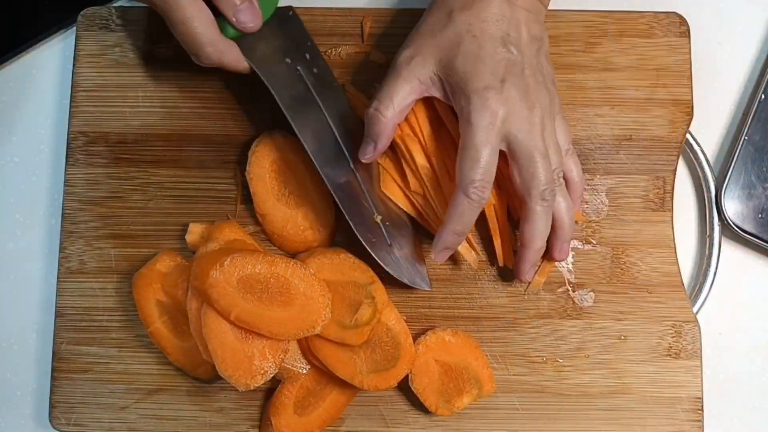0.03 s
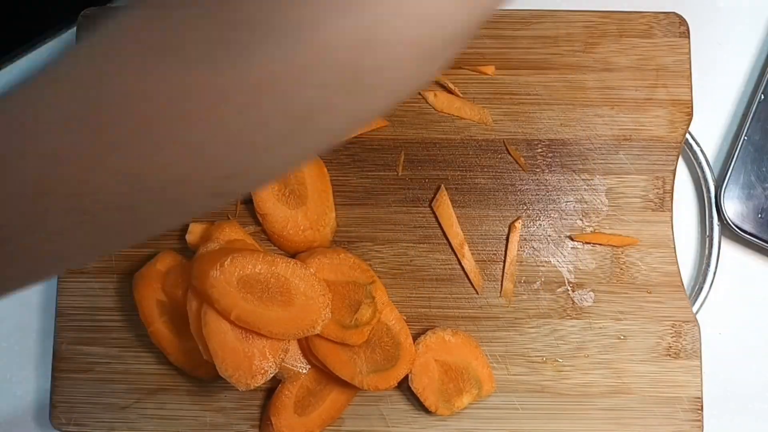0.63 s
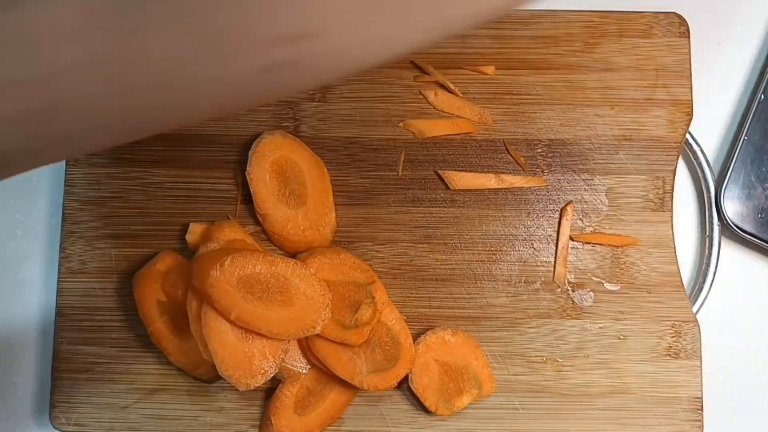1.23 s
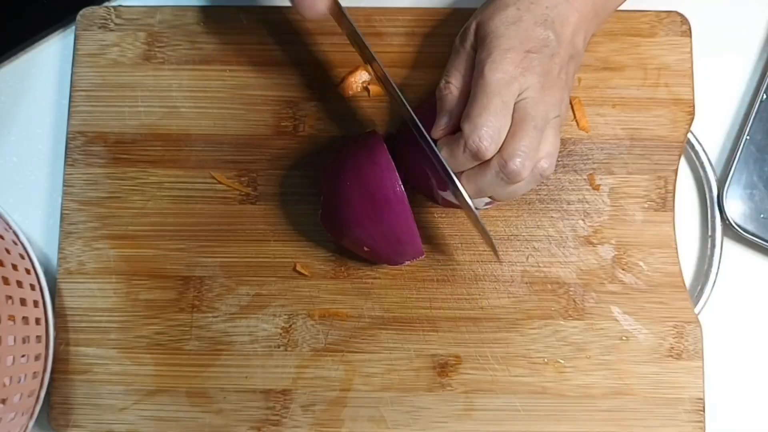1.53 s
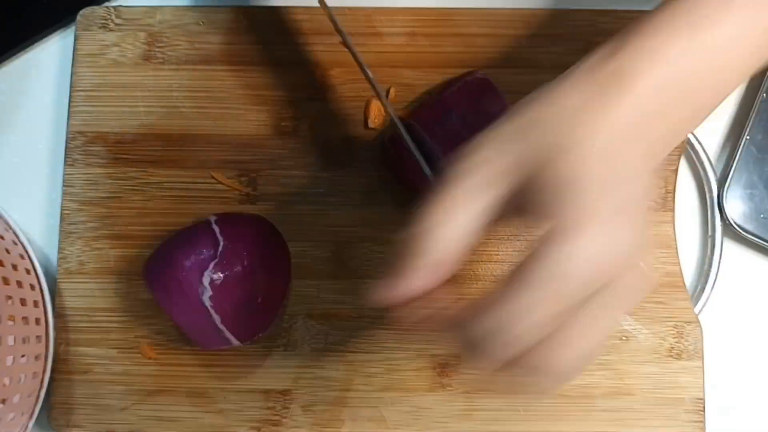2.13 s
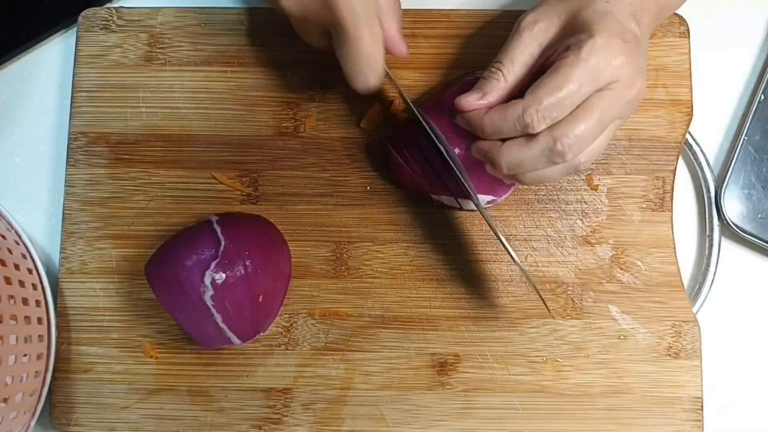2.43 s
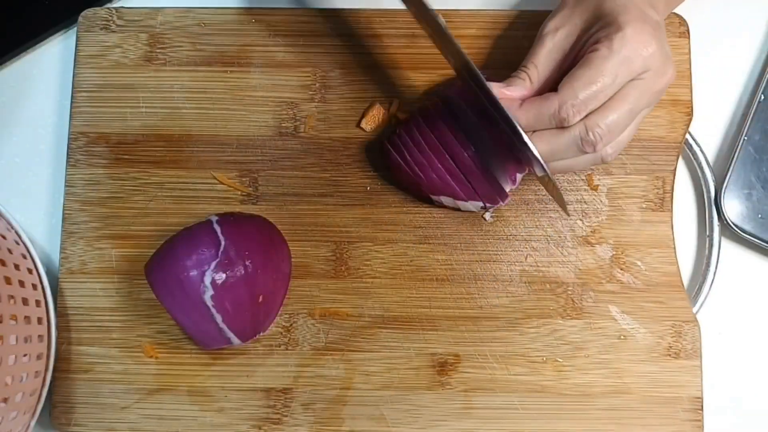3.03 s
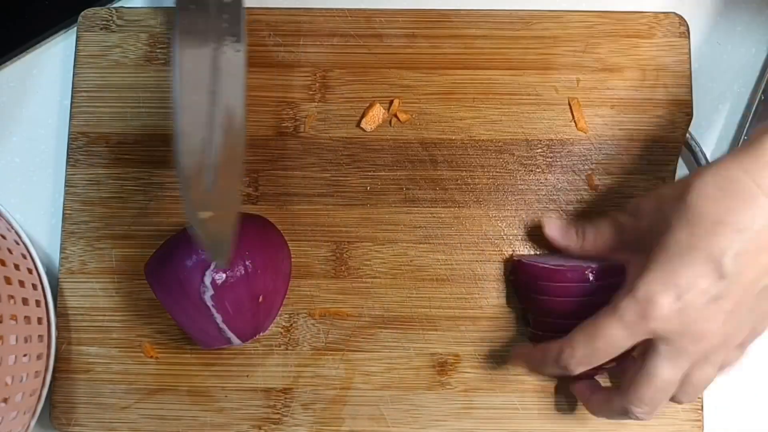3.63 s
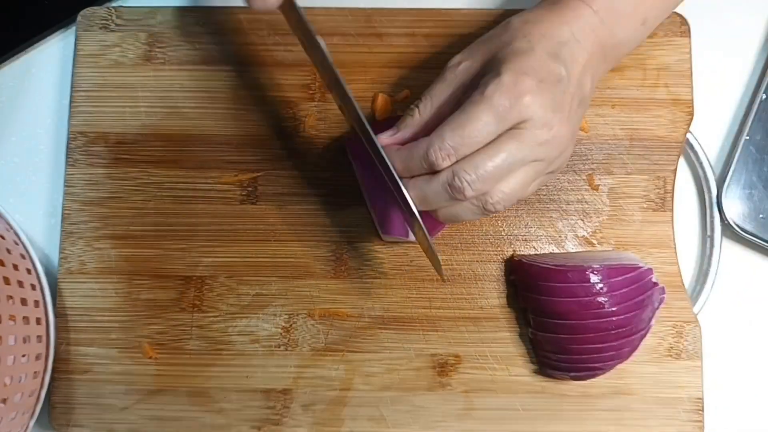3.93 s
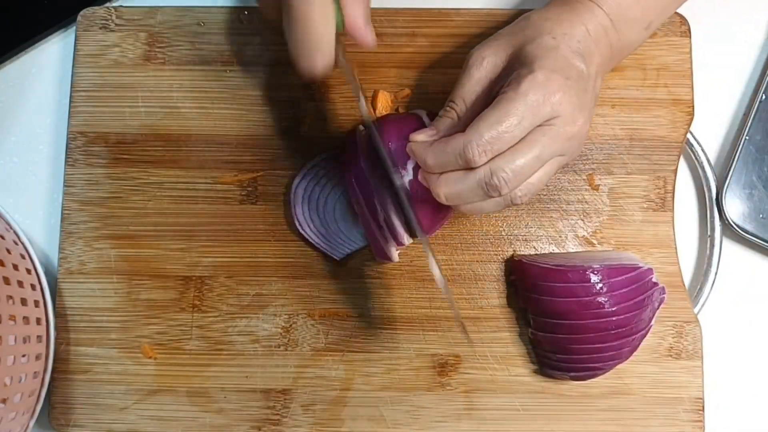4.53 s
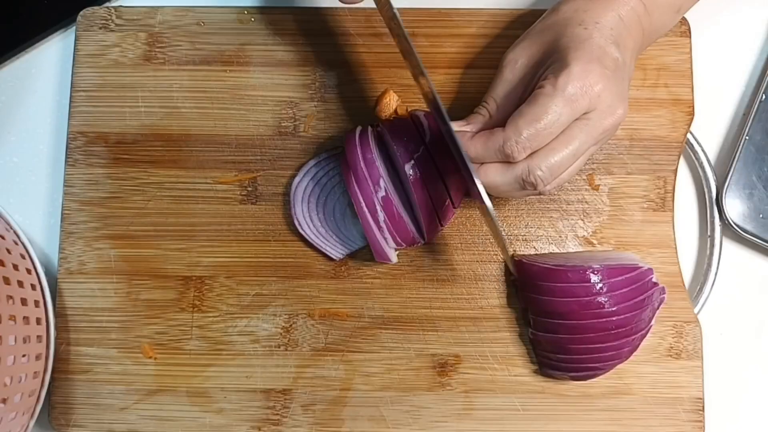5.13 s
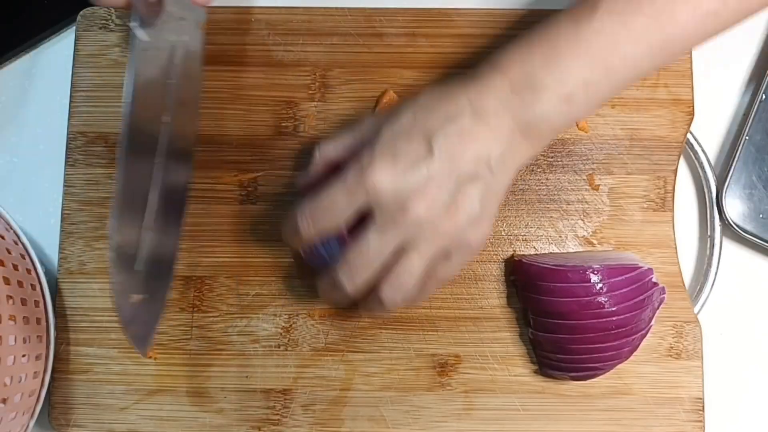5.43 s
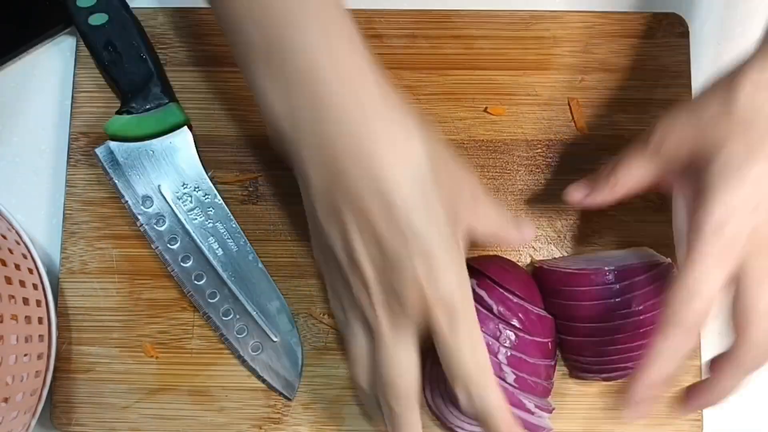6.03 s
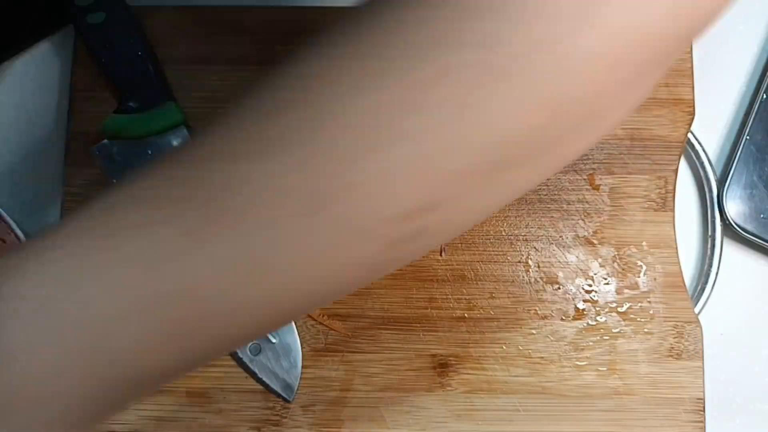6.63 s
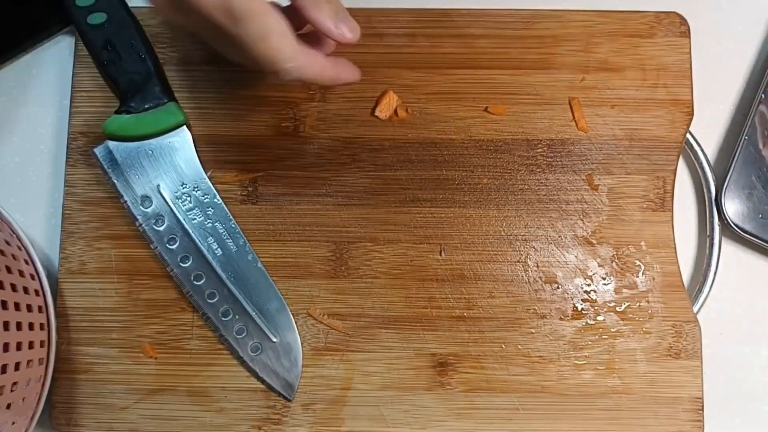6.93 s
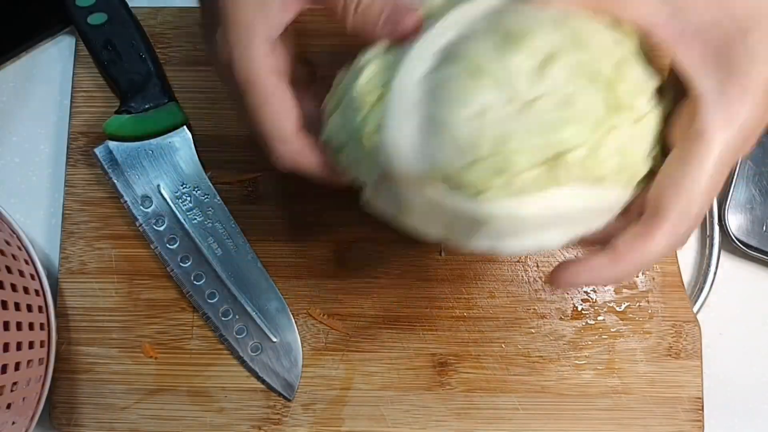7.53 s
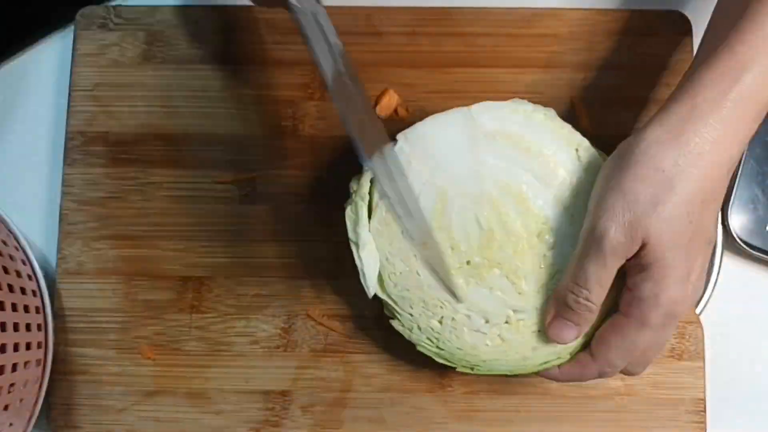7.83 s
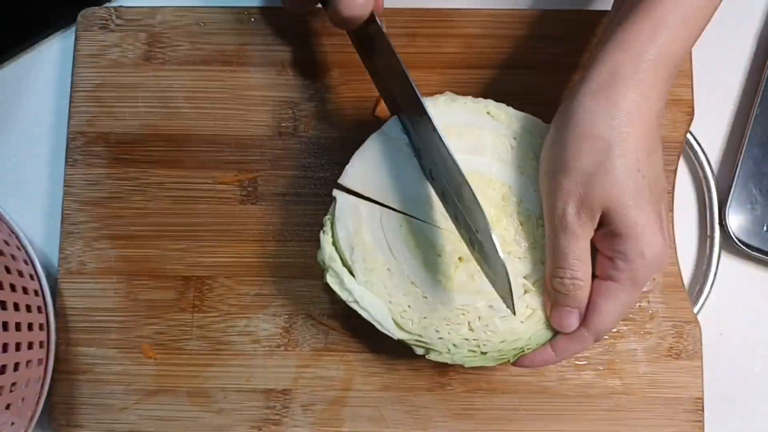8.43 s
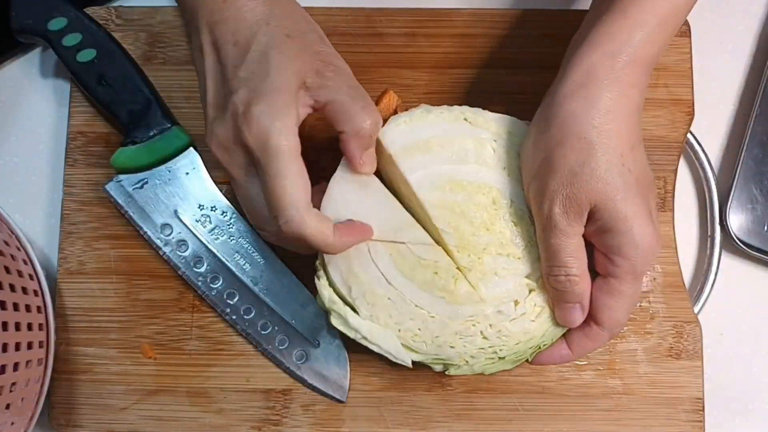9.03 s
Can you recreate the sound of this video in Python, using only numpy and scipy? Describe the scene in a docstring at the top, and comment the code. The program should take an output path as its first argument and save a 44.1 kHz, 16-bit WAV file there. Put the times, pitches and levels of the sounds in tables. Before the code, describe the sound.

A kitchen knife works through vegetables on a wooden board, heard close in a small kitchen with brief reverberation and faint, steady low room noise. In the first second come two light carrot cuts and a tap of the blade. From 1.5 to 3.3 seconds it slices onion in seven uneven strokes, each a short wet crunch ending in a sharp clack, a slight steel ring and a soft low bump. A quicker, regular run follows from 4 to 5.2 seconds. Around 5.8 seconds the knife is put down with a small clatter, and light handling ticks follow. A sharp knock comes at 7.2 seconds, then a dull thump at 7.6 as a cabbage lands. From 8 to 8.5 seconds the cabbage crunches under the blade while the worktop booms softly. Two clacks with a crunch come near 8.7 seconds, then leaves crackle and snap lightly until about 9.3.

```python
"""A kitchen knife shreds carrot, slices onion and cuts into a cabbage on a wooden board.
Each stroke fractures wet cells in a spray of clicks, then the edge strikes the wood and excites
the damped modes of board and blade. Hands shift and set down the vegetables. The jostled worktop
resonates with a soft boom, and the small kitchen adds brief reverberation over steady room noise."""
import sys
import numpy as np
from scipy import signal
from scipy.fft import rfft, irfft, next_fast_len
from scipy.io import wavfile
from scipy.ndimage import map_coordinates

SR = 44100
rng = np.random.default_rng(int(sys.argv[2]) if len(sys.argv) > 2 else 0)


def to_wav(s):
    """Save 16-bit WAV."""
    ch = np.atleast_2d(s).T  # columns
    pcm = np.round(np.clip(ch, -1, 1) * 32767)  # PCM
    wavfile.write(sys.argv[1], SR, pcm.astype(np.int16))


N = 408807

# Levels in the tables are relative: each source adds its own gain.
# spectra of room noise, worktop, light touch, edge impact and cell fracture: (frequency [Hz], level [dB])
AIR_SPECTRUM = [(25, -14.5), (55, -17.5), (105, -9.5), (140, -8.5), (200, -3), (280, 1), (380, -15.5),
                (470, -10.5), (750, -26.5), (1020, -25.5), (1400, -32), (4000, -34), (8000, -41),
                (16000, -42)]
BOOM_SPECTRUM = [(25, -19), (55, -18), (80, -21), (106, -10), (138, -16), (165, -25.5), (195, 1.5),
                 (235, -12.5), (290, -9.5), (370, -30), (450, -27), (600, -40.5), (1200, -75)]
TICK_SPECTRUM = [(100, -38), (700, -27.5), (1400, -11), (2900, -8), (4000, -9), (7000, -11), (16000, -13)]
CLACK_SPECTRUM = [(100, -47.5), (500, -44), (800, -30), (1100, -17), (1800, -8.5), (2300, -9), (2900, -0.5),
                  (3700, -10.5), (4700, -1.5), (6500, -15), (9000, -19.5), (16000, -37.5)]
CRUNCH_SPECTRUM = [(100, -39.5), (800, -21), (1300, -13), (1800, -0.5), (2300, -3.5), (2900, 0.5),
                   (3600, -6), (4500, 1.5), (7500, -3), (11000, -0.5), (16000, 0.5)]
# reverberation time of the kitchen: (frequency [Hz], t60 [s])
ROOM_DECAY = [(200, .14), (1000, 0.095), (3000, 0.085), (8000, 0.092), (16000, 0.066)]
# colour of the microphone ports: (frequency [Hz], left minus right [dB])
PORT_BALANCE = [(100, 1.5), (260, -0.5), (550, 2.5), (1100, 5.5), (2400, -3.5), (4500, 3), (9000, -2.5),
                (15000, -1)]
# the board under the edge: (frequency [Hz], bandwidth [Hz], level [dB])
BOARD_MODES = [(446, 33, -8.5), (696.4, 33, -2.5), (1001.6, 60, -2), (1222, 230, -8)]
# the board's low bounce and hollow knock under a blow: (frequency [Hz], level [dB], t60 [s])
BOUNCE_MODES = [(104.4, -9.5, 0.15), (198, -3, 0.15), (255, 5.5, 0.055), (308, -18, 0.095)]
KNOCK_MODES = [(416, -11, 0.066), (464, 2.5, 0.052), (532, -13, 0.0478), (690, -7.5, 0.085), (1534, 0, .05)]
# the steel blade: (frequency [Hz], level [dB])
BLADE_MODES = [(1840, -12.5), (2053, -10), (2245, -4), (2640, -4.5), (2688, -8.5), (2885, 2), (3045, -10.5),
               (3240, 4.5), (3632, -7.5), (3782, -10.5), (4490, -11.5), (4722, -9)]
# hands lean on the board or shift it: (midpoint [s], duration [s], boom [dB])
PUSHES = [(0.122, 0.0097, -40.5), (0.23, 0.014, -41), (0.343, 0.025, -42.5), (1.192, 0.027, -44.5),
          (2.376, 0.017, -43), (3.534, 0.028, -42), (3.92, 0.065, -42), (4.455, 0.046, -38),
          (6.348, 0.26, -49.5), (7.081, 0.074, -30), (7.289, 0.094, -30), (7.451, 0.0084, -43),
          (7.588, 0.07, -31.5), (7.74, 0.11, -37), (8.077, .06, -40), (8.356, 0.056, -30),
          (8.463, 0.023, -37), (9.089, 0.02, -39)]
# dull blows of a vegetable or the blade on the board: (time [s], level [dB], knock [dB])
THUDS = [(0.532, -30.5, 0.5), (1.446, -37.5, -13.5), (2.05, -24, -4), (3.044, -27, -24),
         (7.577, -11.5, -27)]
# knife and vegetables are put down, picked up or snapped: (time [s], level [dB], treble [dB])
TOUCHES = [(0.1605, -22, -43.5), (0.2523, -32, -11.5), (0.5024, -24, -46), (2.0505, -22.5, -22),
           (5.335, -32.5, 10), (5.7555, -13, -9.5), (5.7808, -22, 5), (5.794, -19.5, -8),
           (5.8344, -16.5, -16), (5.8586, -13.5, -14), (6.1373, -44.5, -18.5), (6.5139, -21.5, -20.5),
           (6.5533, -35, -26), (6.66, -44, -21), (6.6955, -32, -21), (7.159, -24.5, -6.5),
           (7.2189, -3.5, -1.5), (7.3342, -31.5, 22), (7.5757, -16, -10), (7.6928, -28, -21.5),
           (8.1495, -29.5, -16.5), (8.215, -43, 7), (8.7205, -23, -15.5), (8.742, -16.5, -13.5),
           (8.8802, -29, -8), (9.036, -23, -10), (9.0816, -23, -4), (9.2449, -17, -3)]
# food slides under the hand or leaves tear: (start [s], duration [s], level [dB], treble [dB])
RUBS = [(0.876, 0.011, -40.5, -16), (1.364, 0.018, -53.5, -9), (1.44, 0.016, -53, -1),
        (1.562, 0.14, -62, 3), (1.816, .07, -62, -13), (1.919, 0.091, -58, -4.5), (2.095, .045, -53.5, -7),
        (2.348, 0.14, -62.5, -4.5), (3.528, 0.036, -60, 3), (3.723, .05, -49.5, -8.5),
        (3.934, 0.15, -46, -5), (5.339, 0.17, -82.5, 17.5), (5.771, 0.028, -43.5, 2.5),
        (5.837, 0.027, -45, 7), (5.939, 0.14, -64, -4.5), (7.16, 0.11, -46, -4.5), (7.438, 0.1, -68, 7.5),
        (7.656, 0.054, -49.5, -3.5), (7.893, .25, -54, -3), (8.009, 0.025, -37, -3.5),
        (8.076, 0.017, -36, -0.5), (8.359, .045, -46.5, -5), (8.426, 0.12, -37.5, -5.5),
        (8.478, 0.02, -30.5, -7), (8.899, 0.072, -52, -2), (8.99, 0.094, -51, -2), (9.165, 0.01, -48, 6),
        (9.218, 0.034, -50.5, 4.5)]
# the bare edge taps the board or the hard cabbage: (time [s], level [dB], treble [dB], body [dB])
TAPS = [(0.0666, -22, -21.5, -52), (0.9237, -14, -21, -54), (4.4054, -9, -33.5, -43),
        (8.6885, -8.5, -22, -35)]
# the knife pricks the skin, cuts the flesh and lands: (landing [s], cutting time [s], prick [dB],
# crunch [dB], crunch treble [dB], clack [dB], clack treble [dB], body [dB], boom [dB])
STROKES = [(0.213, .072, -44.5, -34.5, -13.5, -32, -45, -41, -60),
           (0.5233, .026, -64, -30.5, -7, -18, -9, -20, -44.5),
           (1.522, .031, -58, -30, -9.5, -11.5, -23.5, -28, -38.5),
           (1.7135, 0.033, -28, -31.5, -9.5, -9.5, -25.5, -44.5, -47.5),
           (2.2973, 0.059, -60, -31.5, -10, -17.5, -62, -65, -41.5),
           (2.5894, 0.037, -52, -29, -9.5, -9, -16, -19, -53),
           (2.7546, 0.038, -52, -28.5, -10, -9, -31.5, -35, -49),
           (2.8971, 0.038, -28.5, -28, -10.5, -7, -20, -37, -43),
           (3.0841, .054, -51.5, -33, -4, -14, -57, -25, -44.5),
           (3.3193, .064, -44, -34.5, -5.5, -8, -14.5, -29, -43),
           (4.0172, .042, -27.5, -34, -6, -3.5, -8.5, -55, -50),
           (4.1852, .047, -22.5, -31, -9, -10, -27.5, -39, -42),
           (4.341, .043, -24, -33, -5, -44, -37, -38, -39.5),
           (4.6408, .036, -23, -29.5, -8.5, -7, -21.5, -31, -42),
           (4.81, .036, -26, -30, -5.5, -9, -31.5, -56, -44),
           (4.9797, .033, -27, -32.5, -5.5, -7, -21, -41, -42.5),
           (5.1537, .031, -28.5, -35.5, -3, -8.5, -20, -26.5, -38),
           (8.7594, 0.065, -44, -29.5, -8, -8.5, -12, -29, -54)]


def amp(db):
    """Amplitude ratio of a level in decibels."""
    return 10 ** (np.asarray(db) / 20)


def unit(x):
    """The signal scaled to an RMS of 1."""
    return x / np.sqrt(np.mean(x ** 2) + 1e-20)


def along(points, hz):
    """Interpolation of (frequency [Hz], value) points on a logarithmic frequency axis."""
    frequencies, values = np.transpose(points)
    return np.interp(np.log(hz + 1), np.log(frequencies + 1), values)


def wobble(rate, size=N):
    """A smooth random curve with `rate` knots a second."""
    knots = rng.standard_normal(int(size * rate / SR) + 4)
    return map_coordinates(knots, [np.arange(size) * rate / SR])


def filtered(x, response):
    """Linear filtering: the spectrum times a complex frequency response."""
    size = x.shape[-1]
    padded = next_fast_len(size + 4096)
    return irfft(rfft(x, padded) * response(np.fft.rfftfreq(padded, 1 / SR)), padded)[..., :size]


def add(track, start_s, sound):
    """Superposition of a sound on a track."""
    i = max(0, round(start_s * SR))
    track[i:i + len(sound)] += sound[:max(0, len(track) - i)]


def shelf(hz, edge_hz):
    """A smooth step: 0 in the bass, 1 well above the edge."""
    return hz ** 4 / (hz ** 4 + edge_hz ** 4)


def snap(spectrum_db, size=4096):
    """Minimum phase gives the most compact causal pulse with this spectrum; its peak is 1."""
    cepstrum = irfft(np.log(amp(spectrum_db(np.fft.rfftfreq(size, 1 / SR)))))
    cepstrum[1:size // 2] *= 2
    cepstrum[size // 2 + 1:] = 0
    pulse = irfft(np.exp(rfft(cepstrum)))
    return pulse / np.abs(pulse).max()


def ring(modes, t):
    """Free vibration: damped modes, with new strengths and phases at each strike."""
    return sum(amp(db + 1.5 * rng.standard_normal() - 60 * t / t60)
               * np.sin(2 * np.pi * (hz * t + rng.random())) for hz, db, t60 in modes)


def contact(spectrum_db, chatter_db, chatter_t60, size=2048):
    """An impact is one sharp force pulse followed by decaying chatter of the surfaces."""
    t = np.arange(size) / SR
    chatter = amp(chatter_db - 60 * t / chatter_t60) * rng.choice([-1, 1], size)
    force = chatter * (1 - np.exp(-t / 0.00044))
    force[0] = 1
    pulse = snap(spectrum_db)
    sound = signal.fftconvolve(force, pulse)
    return sound * np.linalg.norm(pulse) / np.linalg.norm(sound)


def room_noise():
    """Steady diffuse noise is coherent at the two microphones only at long wavelengths."""
    common, apart = filtered(rng.standard_normal((2, N)), lambda hz: amp(along(AIR_SPECTRUM, hz)))
    apart = filtered(apart, lambda hz: 0.24 + 1.3 * shelf(hz, 600))
    return amp(-57.5) * unit(np.array([common + apart, common - apart]))


def reverberation(x, blocks=48, build_s=0.0021, hold_s=0.003):
    """Near walls reflect a dense, fast-decaying cluster of echoes that shifts as hands and arms move."""
    out, step = np.zeros((2, N)), N // blocks + 1
    hz, t, noise = signal.stft(rng.standard_normal((blocks, 2, SR // 8)), SR, nperseg=256)
    decay = amp(-60 * np.maximum(t - hold_s, 0) / along(ROOM_DECAY, hz)[:, None])
    tails = signal.istft(noise * decay, SR, nperseg=256)[1]
    tails *= 1 - np.exp(-(np.arange(tails.shape[-1]) / SR / build_s) ** 2)
    for i, tail in zip(range(0, N, step), tails):
        echo = signal.fftconvolve(x[None, i:i + step], tail / np.linalg.norm(tail[0]), axes=1)[:, :N - i]
        out[:, i:i + echo.shape[1]] += echo
    return out


def near_reflection(x, delay_s=0.001041, echo_db=-9):
    """Comb filtering: a dull echo from a nearby surface interferes with the direct sound."""
    echo = lambda hz: amp(echo_db) * np.exp(-2j * np.pi * hz * delay_s) * (1 - shelf(hz, 3400))
    return filtered(x, lambda hz: 1 + echo(hz))


def microphones(x, lag_samples=13.5):
    """Path difference: sound reaches the nearer, right microphone first; each port colours it."""
    side = np.array([[1], [-1]])
    delay = lambda hz: np.exp(-1j * np.pi * hz / SR * lag_samples * side)
    return filtered(x, lambda hz: amp(side * along(PORT_BALANCE, hz) / 2) * delay(hz))


def jostle_level(hold_s=.035, edge_s=0.016, rest_db=-57, swing_db=4.5):
    """Powers add: the worktop's level in dB sums an uneven murmur and a swell per stroke or push."""
    t = np.arange(0, N, 64) / SR
    strokes = [(s - cut_s / 2, s + hold_s, db) for s, cut_s, *_, db in STROKES]
    pushes = [(s - length / 2, s + length / 2, db) for s, length, db in PUSHES]
    power = sum(amp(2 * db) * np.exp(-2 * ((t - np.clip(t, start, end)) / edge_s) ** 2)
                for start, end, db in strokes + pushes)
    murmur = amp(rest_db + swing_db * wobble(14))
    return 10 * np.log10(np.interp(np.arange(N) / SR, t, power) + murmur ** 2)


def worktop(ring_hz=192, waver_hz=9):
    """Jostling excites the worktop's low resonances; one mode dominates the strongest swells."""
    level_db = jostle_level()
    rumble = unit(filtered(rng.standard_normal(N), lambda hz: amp(along(BOOM_SPECTRUM, hz))))
    tone = np.sqrt(2) * np.sin(2 * np.pi * np.cumsum(ring_hz + waver_hz * wobble(25)) / SR)
    tone_share = np.clip((level_db + 47.5) / 20, 0, .9)
    return amp(level_db) * (np.sqrt(1 - tone_share) * rumble + np.sqrt(tone_share) * tone)


def thuds(landing_knock_db=-18.5):
    """Soft blows and knife landings excite the board's low modes; harder blows add a higher knock."""
    out, t = np.zeros(N), np.arange(SR // 4) / SR
    landings = [(s, boom_db + 1, landing_knock_db) for s, *_, boom_db in STROKES]
    bounce = sum(amp(db - 60 * t / t60) * np.sin(2 * np.pi * hz * t) for hz, db, t60 in BOUNCE_MODES)
    for s, db, knock_db in THUDS + landings:
        add(out, s, amp(db - 3.5) * bounce * (1 - np.exp(-t / 0.0017)))
        add(out, s, amp(db + knock_db + 5) * ring(KNOCK_MODES, t) * (1 - np.exp(-t / 0.0015)))
    return out


def ticks(skin_hold_s=.016, skin_treble_db=-5.5, rustles_per_s=4.6):
    """Brief contacts have broad spectra: handling, the prick before each cut, stray fingers and peel."""
    out = np.zeros(N)
    pricks = [(s - cut_s - skin_hold_s, db, skin_treble_db) for s, cut_s, db, *_ in STROKES]
    draws = rng.random((int(rustles_per_s * N / SR), 2))
    rustles = [(when * N / SR, -58 + 7 * (2 * size - 1), skin_treble_db) for when, size in draws]
    for s, db, treble_db in TOUCHES + pricks + rustles:
        colour = lambda hz: along(TICK_SPECTRUM, hz) + 1.38 * (treble_db + 7.5) * shelf(hz, 5500)
        add(out, s, amp(db + 11.5) * contact(colour, chatter_db=-2.5, chatter_t60=0.014))
    return out


def board_response(hz):
    """Modal superposition: the board responds as a sum of resonators of alternating sign."""
    return sum((-1) ** k * amp(db) * 1j * hz * width / (centre ** 2 - hz ** 2 + 1j * hz * width)
               for k, (centre, width, db) in enumerate(BOARD_MODES))


def blade(t, t60=0.061):
    """The steel's free vibration is quickly damped by hand and food."""
    return ring([(hz, db, t60) for hz, db in BLADE_MODES], t)


def crunch(cut_cells_per_s=4500, rub_cells_per_s=600, bite_s=.0035, swell_s=.01, release_t60=0.0085):
    """Fracture: cell walls burst in random clicks. Firm cuts bite and ring the blade; soft rubs swell."""
    out = np.zeros(N)
    # the last two values: drive on the board [dB], unevenness of the yielding fibres [dB]
    cuts = [(s - cut_s, cut_s, db, treble_db, -10.5, 0.8) for s, cut_s, _, db, treble_db, *_ in STROKES]
    rubs = [(*rub, -22, 3.5) for rub in RUBS]
    for start, length, db, treble_db, body_db, catch_db in cuts + rubs:
        t = np.arange(int((length + .05) * SR)) / SR
        firmness = np.clip((db + 59) / 22, 0, 1)
        density = rub_cells_per_s + firmness * (cut_cells_per_s - rub_cells_per_s)
        bursts = (rng.random(len(t)) < density / SR) * rng.standard_normal(len(t))
        # the flesh gives way layer by layer while fibres catch more slowly
        layers = map_coordinates(rng.standard_normal(len(t)), [t * 420])
        catches = map_coordinates(rng.standard_normal(len(t)), [t * 70])
        bursts *= amp(3 * layers + catch_db * catches)
        spray = unit(filtered(bursts, lambda hz: amp(along(CRUNCH_SPECTRUM, hz))))
        spray = filtered(spray, lambda hz: amp((treble_db + 3.5) * shelf(hz, 5300)))
        steel = firmness * unit(signal.fftconvolve(bursts, blade(t))[:len(t)])
        rise_s = bite_s + swell_s * (1 - firmness)
        envelope = (1 - np.exp(-t / rise_s)) * amp(-60 * np.maximum(t - length, 0) / release_t60)
        depth = np.minimum(t / (.5 * length), 1)  # the board is driven harder as the blade sinks in
        body = filtered(depth * envelope * bursts, board_response)
        body /= filtered(bursts, board_response).std()
        add(out, start, amp(db + 3) * envelope * (spray + amp(-14) * steel) + amp(db + body_db) * body)
    return out


def chops(settle_s=.013, settle_width_s=0.0038):
    """Impact: the edge clacks and the blade rings; the rest of the edge settles and drives the board."""
    out, t = np.zeros(N), np.arange(SR // 8) / SR
    landings = [(s, db, treble_db, body_db, True) for s, *_, db, treble_db, body_db, _ in STROKES]
    taps = [(*tap, False) for tap in TAPS]
    for s, db, treble_db, body_db, through_food in landings + taps:
        colour = lambda hz: (along(CLACK_SPECTRUM, hz) + (treble_db + 16) * shelf(hz, 4800)
                             + 0.44 * (body_db + 25.5) * (1 - shelf(hz, 1100)))
        add(out, s, amp(db + 8) * contact(colour, chatter_db=-13, chatter_t60=0.0097))
        add(out, s, amp(db - 24) * blade(t))
        press = rng.standard_normal(len(t)) * np.exp(-((t - settle_s) / settle_width_s) ** 2)
        add(out, s, amp(db + .5 * body_db + 8.5) * filtered(press, board_response))
        if through_food:  # the settling edge severs the last skin against the wood
            pulse = snap(colour)
            add(out, s, amp(db - 16) * signal.fftconvolve(press, pulse / np.linalg.norm(pulse)))
    return out


def scene():
    """Direct sound from the board, its reverberation and the room noise superpose."""
    blows = near_reflection(chops() + ticks())
    cells = crunch()
    direct = microphones(blows + amp(-1) * cells + thuds() + worktop())
    return direct + reverberation(amp(-4) * blows + amp(1) * cells) + room_noise()


def record(dry, bass_hz=70, ceiling=.9, top_hz=15900):
    """Band limiting thins the deepest bass and cuts the top treble; soft saturation rounds the peaks."""
    thinned = signal.sosfilt(signal.butter(2, bass_hz, "highpass", fs=SR, output="sos"), dry)
    rounded = thinned / (1 + np.abs(thinned / ceiling) ** 6) ** (1 / 6)
    return filtered(rounded, lambda hz: amp(-np.clip(hz - top_hz, 0, 2000) / 15))


dry = scene()
out = record(dry)
to_wav(out)
```